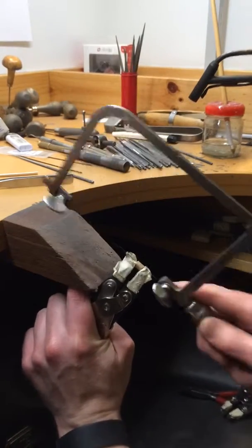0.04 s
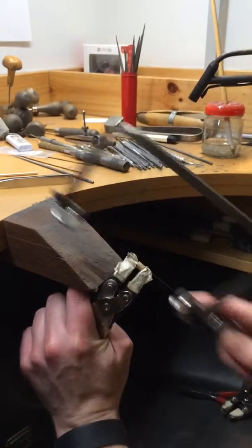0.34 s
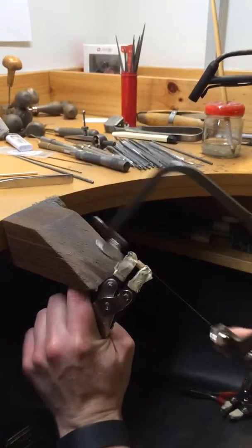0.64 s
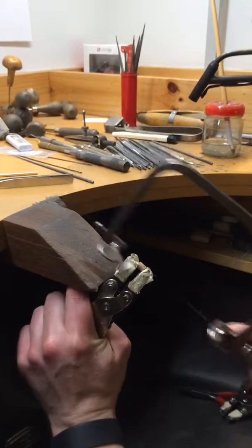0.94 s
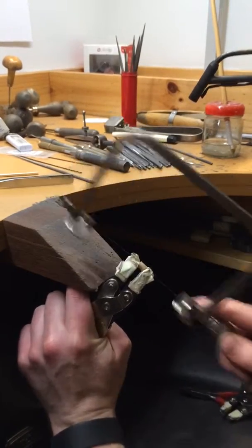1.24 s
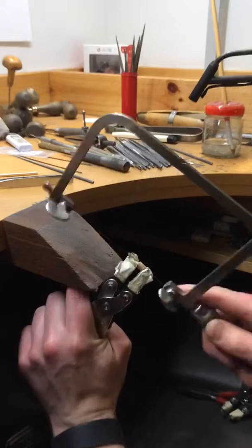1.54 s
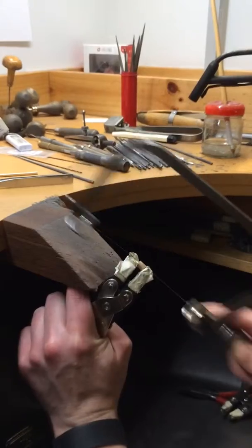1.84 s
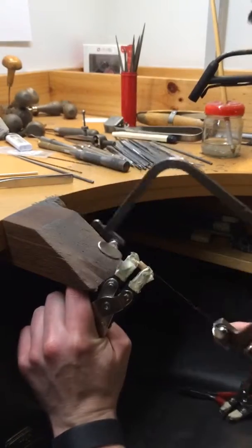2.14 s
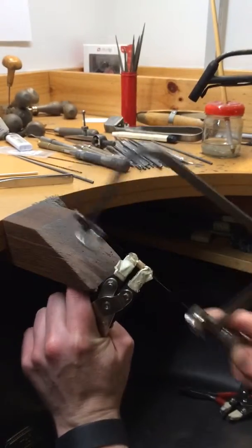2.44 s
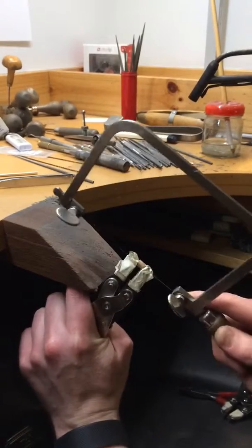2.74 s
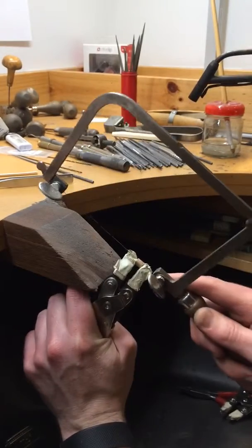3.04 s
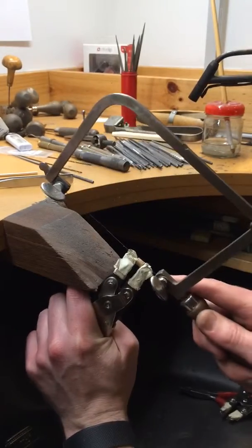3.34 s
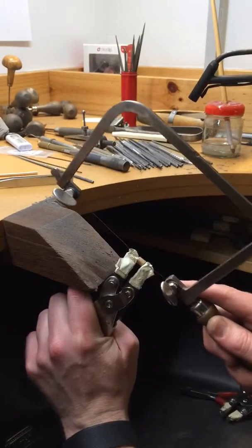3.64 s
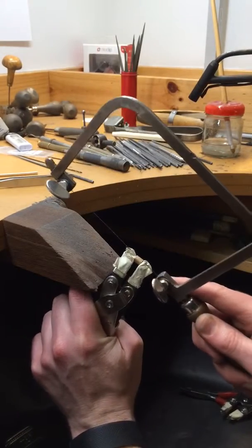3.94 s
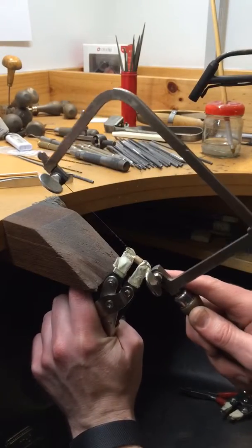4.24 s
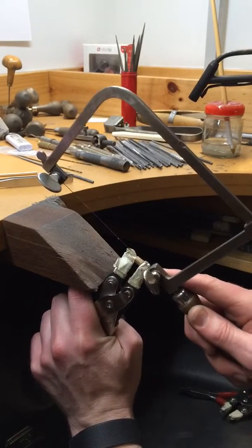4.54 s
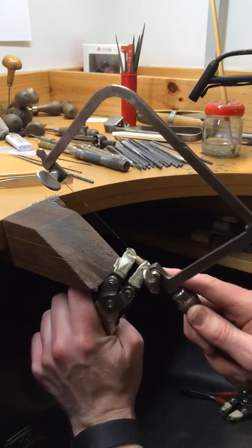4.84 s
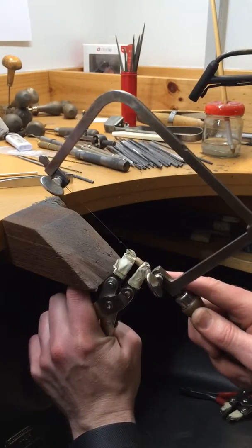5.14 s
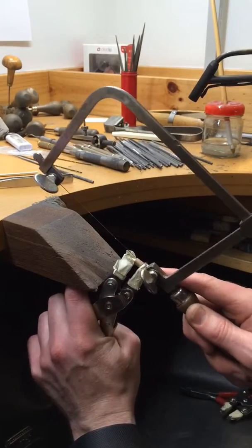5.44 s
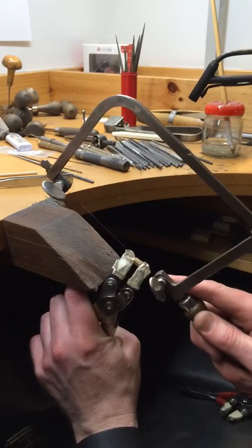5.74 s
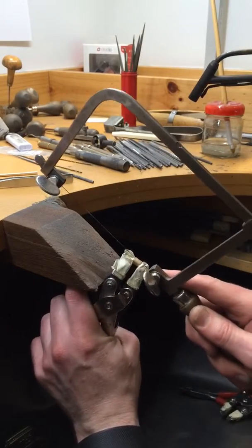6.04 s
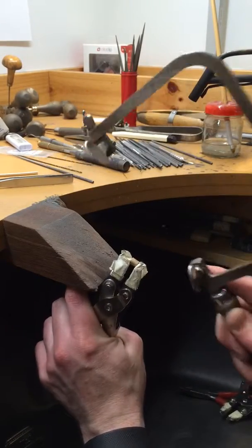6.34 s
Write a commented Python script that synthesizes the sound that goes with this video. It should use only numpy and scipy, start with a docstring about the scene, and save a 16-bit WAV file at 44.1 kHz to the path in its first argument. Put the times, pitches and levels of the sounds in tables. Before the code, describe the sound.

A fine jeweller's saw rasps quickly back and forth through a small metal piece, with low wooden bench vibration and tiny squeaks. The blade jams with a loud knock, then catches again with more knocks and a sharp snap. Sawing gives way to faint rubbing and ticks as the blade is eased in the slot, ending in a bright metallic clink. Heard close in a small, quiet workshop.

```python
"""A jeweller's saw cuts a small metal piece held in pliers against a wooden bench pin.
Each tooth tears a chip, so friction pulses at the tooth rate, rasping and driving the bench's modes.
There are seven cutting strokes and their lighter returns; the blade jams twice with a knock.
Then it is eased to and fro in the slot, until it catches and the steel frame clinks in free vibration.
A small workshop reverberates around it, over its quiet air."""
import sys
import numpy as np
from scipy import signal
from scipy.fft import rfft, irfft
from scipy.io import wavfile
from scipy.ndimage import uniform_filter1d

SR = 44100
rng = np.random.default_rng(int(sys.argv[2]) if len(sys.argv) > 2 else 0)


def to_wav(s):
    """Save 16-bit WAV."""
    ch = np.atleast_2d(s).T  # columns
    pcm = np.round(np.clip(ch, -1, 1) * 32767)  # PCM
    wavfile.write(sys.argv[1], SR, pcm.astype(np.int16))


N = 286650


def amp(db):
    """Amplitude ratio of a level in decibels."""
    return 10 ** (np.asarray(db) / 20)


def unit(x):
    """Normalisation to rms 1."""
    return x / np.sqrt(np.mean(x ** 2) + 1e-20)


def read(points, hz):
    """Interpolation of a table on a log-frequency axis."""
    f, value = np.transpose(points)
    return np.interp(np.log(hz + 1), np.log(f + 1), value)


def add(mix, start_s, sound):
    """Superposition of a sound on the mix."""
    part = mix[round(start_s * SR):][:len(sound)]
    part += sound[:len(part)]


def colour(x, spectrum, size=4096):
    """Minimum-phase filtering by the given spectrum."""
    log_gain = np.log(amp(read(spectrum, abs(np.fft.fftfreq(size, 1 / SR)))))
    taps = np.fft.ifft(np.exp(np.conj(signal.hilbert(log_gain)))).real[:size // 2]
    return signal.oaconvolve(x, taps)[:len(x)]


def wander(hz):
    """Random fluctuation: low-pass noise of rms 1."""
    f = np.fft.rfftfreq(N, 1 / SR)
    return unit(irfft(rfft(rng.standard_normal(N)) / (1 + (f / hz) ** 4), N))


def ring(modes):
    """Modal impulse response: damped sinusoids, neighbours in opposite phase."""
    t = np.arange(SR // 2) / SR
    return sum((-1) ** k * amp(db - 60 * t / t60) * np.sin(2 * np.pi * hz * t)
               for k, (hz, db, t60) in enumerate(modes))


def hold(phase, rise, fall):
    """Rounded envelope over a movement's phase, 0 to 1; rise and fall are shares of it."""
    attack = 1 - np.clip(1 - phase / rise, 0, 1) ** 2
    release = 1 - np.clip(1 - (1 - phase) / fall, 0, 1) ** 2
    return attack * release


# Spectrum of the workshop's air: frequency_hz, density_db
AIR = [(15, -41.5), (30, -25), (60, -7.5), (100, -2.5), (190, -3.5), (430, -12.5), (620, -11.5),
       (850, -15.5), (1300, -22), (1750, -21.5), (2600, -31.5), (4300, -34.5), (5600, -40), (15500, -44)]

def air(level_db=-57):
    """Ambient noise: steady, and strongest in the bass."""
    return amp(level_db) * unit(colour(rng.standard_normal(N), AIR))


# Reverberation time of the workshop: frequency_hz, t60_s
WORKSHOP = [(150, 0.55), (600, .36), (3000, 0.46), (8000, .3), (15000, 0.32)]

def room(x, spacing=20):
    """Reverberation: sparse reflections of random sign, each band decaying at its own rate."""
    taps, slots = np.zeros(SR), np.arange(SR // 150, SR - spacing, spacing)
    taps[slots + rng.integers(0, spacing, len(slots))] = rng.choice([-1, 1], len(slots))
    hz, t, bands = signal.stft(taps, SR, nperseg=256)
    tail = signal.istft(bands * amp(-60 * t / read(WORKSHOP, hz)[:, None]), SR)[1]
    return signal.fftconvolve(x, tail / np.linalg.norm(tail))[:N]


# Modes of bench and pin: frequency_hz, level_db, t60_s
BENCH_MODES = [(106.4, -11.5, 0.13), (165.1, -2, 0.091), (198.3, -1, 0.15), (245.4, -8, 0.097),
               (337.6, -3, 0.055), (400.3, -5.5, 0.084), (437.7, -6, 0.12), (558, 1.5, 0.029),
               (629.4, -1, .06), (722, -3, 0.045), (863, -1.5, 0.025), (1170, -10, 0.065), (1319, -12, .05),
               (1518, -18, .05), (1647, -17, 0.1), (1790, -15.5, 0.072), (2315, -18, 0.045),
               (2670, -23, 0.055)]
# Jolts of the catching blade: start_s, peak_db, contact_ms
KNOCKS = [(.184, -26, 2.6), (.553, -28, 1.1), (.573, -23.5, 1.1), (.938, -25.5, 0.66), (1.142, -31, 0.36),
          (1.318, -35, 0.74), (1.695, -45, .55), (2.1115, -5.5, 0.26), (2.1175, -31, .32),
          (2.181, -26, 0.53), (2.473, -18, 1.2), (2.490, -22, .66), (2.507, -15, 0.76), (3.362, -37, 2.1),
          (3.69, -38, 2.03), (4.383, -40, 2.72), (4.686, -45.5, 3.17), (5.262, -42, 2.38),
          (5.69, -37.5, 2.2), (6.334, -27.5, 1.29), (6.355, -27, 1.05)]
# Spectrum of the rattling frame and pliers: frequency_hz, density_db
RATTLE = [(150, -25.5), (400, -8.5), (900, -11), (1500, -1.5), (2700, -5.5), (3500, -12), (7500, -16.5),
          (15000, -23)]

def knocks(rattle_db=-14, rattle_rise_s=0.00396, rattle_t60=0.15):
    """Impact excitation of the bench modes: the longer the contact, the duller the knock."""
    out, bench = np.zeros(N), ring(BENCH_MODES)
    t, ms = np.arange(SR // 5) / SR, np.arange(SR // 50) * 1000 / SR
    for start_s, db, contact_ms in KNOCKS:
        force = ms * np.exp(-4 * ms / contact_ms)
        knock = signal.fftconvolve(bench, force)
        add(out, start_s, amp(db) * knock / abs(knock).max())
        rattle = unit(colour(rng.standard_normal(len(t)), RATTLE)) * (1 - np.exp(-t / rattle_rise_s))
        # square law: only hard blows rattle audibly
        add(out, start_s, rattle * amp(2 * db + rattle_db - 60 * t / rattle_t60))
    return out


# Snaps of a tooth: start_s, peak_db
TICKS = [(2.5056, -2.5), (2.904, -52), (3.155, -53), (3.68, -37), (3.743, -43), (4.652, -44), (5.582, -49)]
# Spectrum of a snap: frequency_hz, density_db
TICK_SPECTRUM = [(1000, -17), (3000, -14), (7000, -3.5), (10000, 1.5), (15000, -1)]

def ticks(snap_t60=0.0027, tail_db=-19, tail_t60=0.054):
    """Broadband transients: a tooth snaps past the edge of the slot and the blade fizzes briefly."""
    out, t = np.zeros(N), np.arange(SR // 8) / SR
    decay = amp(-60 * t / snap_t60) + amp(tail_db - 60 * t / tail_t60)
    for start_s, db in TICKS:
        tick = colour(rng.standard_normal(len(t)) * decay, TICK_SPECTRUM)
        add(out, start_s, amp(db) * tick / abs(tick).max())
    return out


# Modes of the steel frame and blade: frequency_hz, level_db, t60_s
FRAME_MODES = [(1340, -33, 0.39), (2592, -6.5, 0.12), (2680, -1.5, 0.15), (2720, -21, 0.25),
               (3794, -26, 0.36), (3840, -28, 0.26), (3900, -21.5, 0.25), (4608, -22, 0.13),
               (5780, -23, 0.051), (6500, -20, 0.18), (7800, 0, 0.022), (11100, -7.5, 0.065),
               (12600, 0.5, 0.043), (13150, -14, .05), (13500, -14, 0.044), (15000, 0, 0.036)]
# Spectrum of the blade's release: frequency_hz, density_db
CRACK = [(800, -12), (3000, -8), (7500, -4), (9000, -10), (11000, -5), (12500, -11), (15000, 3)]

def clink(start_s=6.3545, crack_db=-20, crack_t60=0.1, ring_db=-19, rise_s=0.0018):
    """Free vibration: the taut blade lets go with a crack and leaves the frame ringing."""
    out, t = np.zeros(N), np.arange(SR // 2) / SR
    crack = unit(colour(rng.standard_normal(len(t)), CRACK)) * amp(crack_db - 60 * t / crack_t60)
    ringing = amp(ring_db) * ring(FRAME_MODES) * (1 - np.exp(-t / rise_s))
    add(out, start_s, crack + ringing)
    return out


# Glides of the blade, one list a squeak: time_s, pitch_hz, level_db
SQUEAKS = [
    [(1.015, 1371, -62), (1.035, 1195, -36), (1.05, 994, -54), (1.065, 797, -35.5), (1.085, 660, -36),
     (1.1, 570, -53)],
    [(1.35, 1342, -59), (1.385, 1326, -47), (1.415, 1184, -49), (1.45, 847, -58)],
    [(2.685, 803, -58), (2.715, 1088, -56), (2.735, 1136, -47), (2.755, 1140, -46), (2.775, 1013, -63),
     (2.795, 810, -39.5), (2.815, 690, -59)],
]

def squeaks(shimmer_db=3):
    """Periodic excitation: teeth falling into step give brief, wavering tones."""
    waver = 1 + .03 * wander(hz=300)
    out, shimmer = np.zeros(N), amp(shimmer_db * wander(hz=120))
    for rows in SQUEAKS:
        times, hz, db = np.transpose(rows)
        t = np.arange(times[0], times[-1], 1 / SR)
        angle = 2 * np.pi * np.cumsum(np.interp(t, times, hz) * waver[:len(t)]) / SR
        add(out, times[0], amp(np.interp(t, times, db)) * unit(shimmer[:len(t)] * np.sin(angle)))
    return out


# Strokes from turn to turn; at 2.062 s the blade sticks for a moment. Bite is 1 cutting, 0 sliding;
# push is the rasp's growth over the stroke; whirr is relative to the drag on the pin:
# start_s, peak_tooth_hz, bite_share, rasp_db, push_db, drag_db, whirr_db
STROKES = [(-.016, 1290, 0.26, -40, -4, -46.5, -13), (.154, 1420, 1, -38, 5, -36, -18),
           (.355, 1350, 0.12, -42.5, -4, -47, -17), (.531, 1310, 1, -34.5, 18, -35.5, -22),
           (.715, 1400, 0.2, -43, 15, -44.5, -14), (0.908, 1410, 1, -36.5, 8.5, -33.5, -21),
           (1.114, 1390, 0.12, -42.5, 8, -39, -12), (1.293, 1410, 1, -37, -4, -35.5, -22),
           (1.492, 1100, 0, -44.5, 15, -41, -4), (1.674, 1330, 1, -37, 7, -35, -20),
           (1.872, 1300, 0, -44, 6.5, -41.5, -16), (2.062, 307, 0.18, -68, 9, -50, -27),
           (2.095, 1160, .86, -43.5, -15.5, -30.5, -19), (2.272, 846, 0.018, -46, 9, -40, -10),
           (2.459, 1150, 0.55, -36, 2, -32, -10.5), (2.664, 1110, 0.31, -44.5, 3, -49.5, -5.5)]

def stroke(end_s=2.845):
    """Reciprocating motion: the phase of the current stroke and its columns, per sample."""
    rows = np.array(STROKES)
    progress = np.interp(np.arange(N) / SR, np.append(rows[:, 0], end_s), np.arange(len(rows) + 1))
    k = np.minimum(progress.astype(int), len(rows) - 1)
    return progress - k, rows[k].T


def blade(creep_hz=259.4):
    """Tooth rate is proportional to speed, down to a wavering creep; bite and whirr gain come with it."""
    phase, (_, peak_hz, bite, _, _, _, whirr_db) = stroke()
    speed = abs(np.sin(np.pi * phase)) ** .7
    tooth_hz = np.maximum(peak_hz * speed, creep_hz * amp(2.5 * wander(hz=8)))
    return tooth_hz, uniform_filter1d(bite, size=600), amp(whirr_db) * speed


# Nudges of the blade to and fro in the slot: start_s, length_s, rasp_db, drag_db
NUDGES = [(2.8, .2, -65.5, -54), (2.93, 0.24, -59.5, -58), (3.107, 0.11, -78, -51.5),
          (3.152, 0.22, -74, -66), (3.321, 0.13, -72, -47.5), (3.444, 0.079, -79, -53),
          (3.59, 0.22, -59.5, -45), (3.631, 0.29, -71.5, -47), (3.919, 0.16, -60, -45.5),
          (4.015, 0.088, -65, -50), (4.164, 0.37, -69, -52.5), (4.414, 0.32, -76, -75),
          (4.649, 0.13, -75.5, -60), (4.905, 0.12, -67.5, -53), (5.13, 0.2, -74, -55),
          (5.364, 0.11, -65, -52.5), (5.55, 0.21, -63.5, -46), (5.719, .25, -74, -60.5),
          (5.83, .11, -82, -49), (5.939, 0.2, -73, -50), (6.163, 0.11, -71.5, -57.5)]

def friction(dig_phase=0.599, dig_db=5, let_up_db=-31.5, rasp_dip_db=-38, rasp_floor_db=-70,
             drag_turn_db=-44.5, drag_ease_db=-3):
    """Sliding friction swells once in each stroke or nudge: gains of the rasp and of the drag."""
    phase, (_, _, bite, rasp_db, push_db, drag_db, _) = stroke()
    # late in a cut the teeth dig in for a moment, then the hand lets up
    hand_db = dig_db * np.exp(-((phase - dig_phase) / 0.057) ** 2)
    hand_db += let_up_db * np.maximum(phase - dig_phase, 0)
    turn_db = rasp_dip_db * (1 - hold(phase, rise=0.31, fall=0.46))
    rasp_gain = amp(rasp_db + push_db * (phase - .5) + bite * hand_db + turn_db) + amp(rasp_floor_db)
    # the drag sets in sooner, lasts longer and eases as the stroke runs on
    swell_db = drag_db + drag_ease_db * (phase - .5) - drag_turn_db
    drag_gain = amp(drag_turn_db + swell_db * hold(phase, rise=.24, fall=0.22))
    stroke_gains = uniform_filter1d(np.array([rasp_gain, drag_gain]) * (phase < 1), size=300)
    t = np.arange(N) / SR
    swells = np.array([hold((t - start) / length, rise=0.49, fall=.57) ** 2
                       for start, length, _, _ in NUDGES])
    nudge_gains = amp(np.array(NUDGES)[:, 2:]).T
    return np.sqrt(stroke_gains ** 2 + nudge_gains ** 2 @ swells ** 2)  # powers add


# Force spectra of creeping and of racing teeth: frequency_hz, density_db
SLOW_DRAG = [(25, -11.5), (90, 10.5), (170, 2.5), (260, -3), (450, -5), (700, -8.5), (1100, -14),
             (1800, -5.5), (3000, -19), (6000, -38.5)]
FAST_DRAG = [(25, -9), (90, 8.5), (170, -0.5), (260, -0.5), (450, -3), (750, -3), (1100, -7.5),
             (1800, -2.5), (3000, -11.5), (6000, -31)]

def rumble(tearing, tooth_hz, lump_db=1.5, racing_hz=1100):
    """Forced vibration: uneven drag drives the bench through the pin, brighter at speed."""
    force = tearing * rng.standard_normal(N) * amp(lump_db * wander(hz=49.3))
    shake = signal.oaconvolve(force, ring(BENCH_MODES))[:N]
    fast = np.clip(tooth_hz / racing_hz, 0, 1)
    return (1 - fast) * unit(colour(shake, SLOW_DRAG)) + fast * unit(colour(shake, FAST_DRAG))


def whirr(teeth, chip, smear_cycles=.3):
    """Tooth-passing tone: two harmonics, roughened by phase noise and chip size."""
    angle = 2 * np.pi * (teeth + smear_cycles * wander(hz=352))
    return unit(chip * (np.sin(angle) + 0.26 * np.sin(2 * angle)))


def flutter(grains, share=0.51, t60=0.047, size=1024):
    """Dense resonance: the steel answers each grain with a short ring that shifts as the blade slides."""
    tails = rng.standard_normal((2, size)) * amp(-60 * np.arange(size) / SR / t60)
    a, b = (signal.oaconvolve(grains, tail / np.linalg.norm(tail))[:N] for tail in tails)
    shift = 2 * np.pi * wander(hz=1.5)
    return grains + share * (np.cos(shift) * a + np.sin(shift) * b)


# Rasp spectra of cutting and of sliding teeth: frequency_hz, density_db
CUTTING = [(500, -36.5), (1100, -20), (1900, -6), (2550, 0), (3100, -6.5), (4100, 2), (5200, -3), (7200, 2),
           (8600, -5), (11000, -4), (12400, -8.5), (13300, -5), (15200, -9)]
SLIDING = [(500, -20), (1100, -13), (1800, -2.5), (2300, -5.5), (3300, -5), (4300, 2), (7000, -1),
           (9000, -3.5), (10500, -1), (11800, 1.5), (12500, -5), (15200, -7)]

def rasp(tearing, bite, judder_db=1.5):
    """Amplitude-modulated noise: a burst of grit for each tooth, coloured by the bite."""
    grains = flutter(tearing * rng.standard_normal(N) * amp(judder_db * wander(hz=70)))
    return bite * unit(colour(grains, CUTTING)) + (1 - bite) * unit(colour(grains, SLIDING))


def sawing(jitter=.11, chip_db=2.0, steady_grit=0.48, decay_cycles=0.38):
    """Quasi-periodic excitation: each tooth tears a chip, rasping in the air and tugging the bench."""
    tooth_hz, bite, whirr_gain = blade()
    teeth = np.cumsum(tooth_hz * np.exp(jitter * wander(hz=300.5))) / SR  # count of teeth passed
    chip = amp(chip_db * np.clip(rng.standard_normal(N), -2, 2))[teeth.astype(int)]
    tearing = unit(chip * (steady_grit + np.exp(-(teeth % 1) / decay_cycles)))
    grit = rasp(tearing, bite)
    drag = rumble(tearing, tooth_hz) + whirr_gain * whirr(teeth, chip)
    rasp_gain, drag_gain = friction()
    return rasp_gain * grit + drag_gain * drag


def scene():
    """Superposition of direct sound, reverberation and ambient noise, in mono."""
    saw, wood, steel = sawing() + squeaks(), knocks(), ticks() + clink()
    echo = room(amp(-14.0) * saw + amp(-10.0) * wood + amp(-15.5) * steel)
    return (saw + wood + steel + echo + air())[None]


def record(dry, cutoff_hz=15450):
    """Band limiting by a linear-phase low-pass filter."""
    lowpass = signal.firwin(401, cutoff_hz, window=("kaiser", 8), fs=SR)
    return signal.oaconvolve(dry, lowpass[None], "same")


dry = scene()
out = record(dry)
to_wav(out)
```